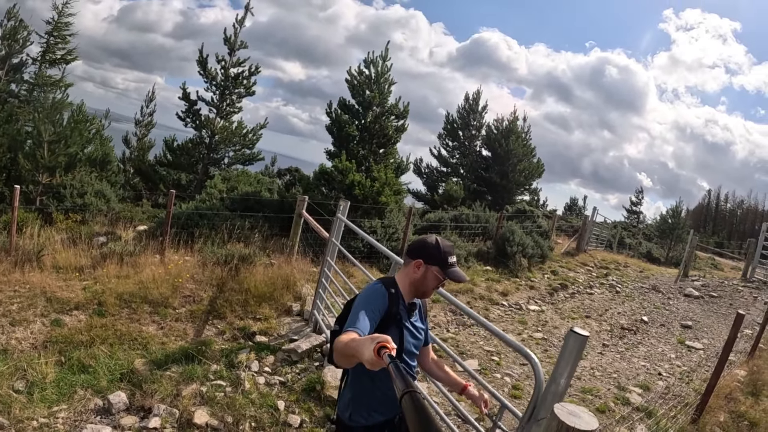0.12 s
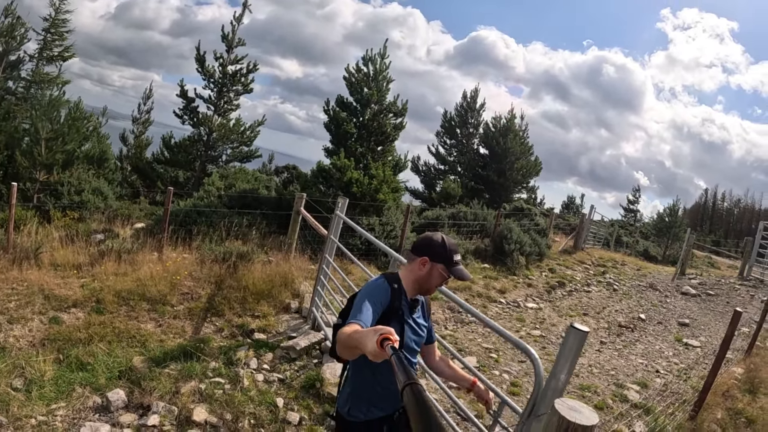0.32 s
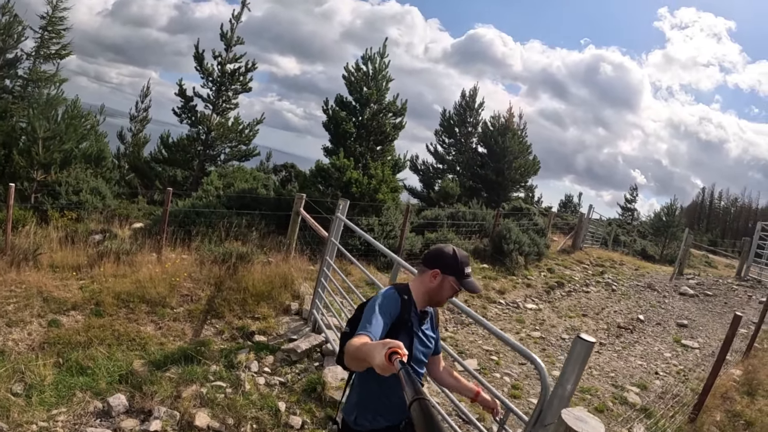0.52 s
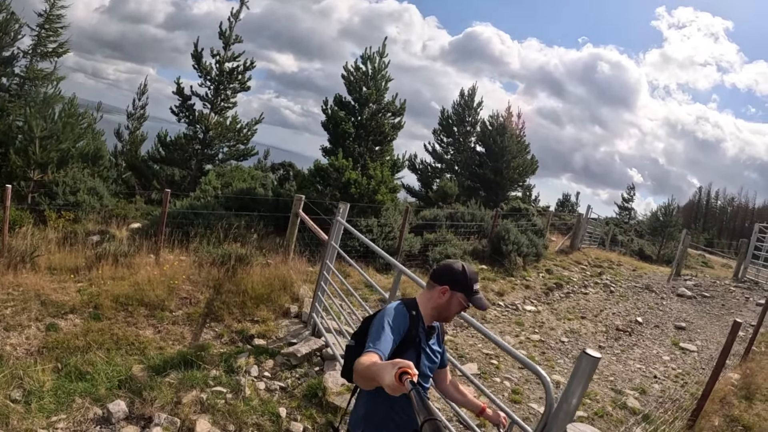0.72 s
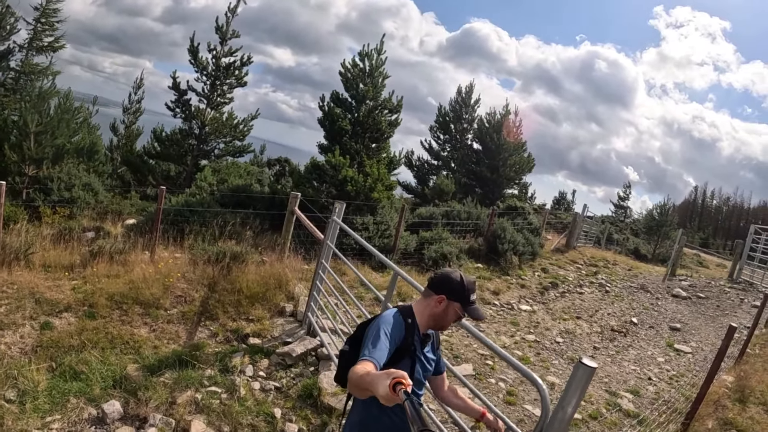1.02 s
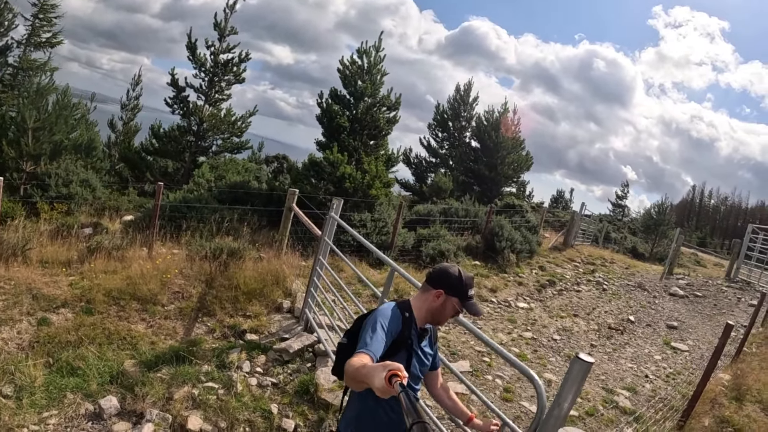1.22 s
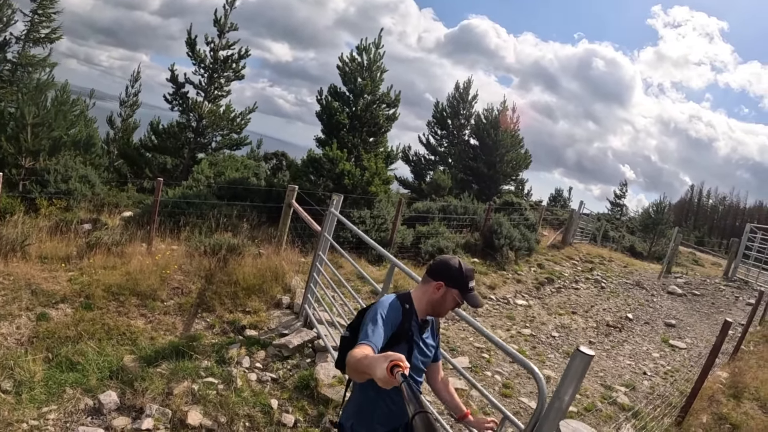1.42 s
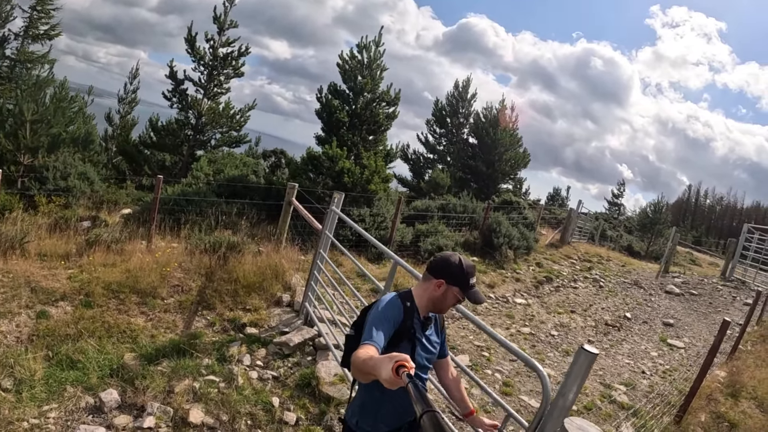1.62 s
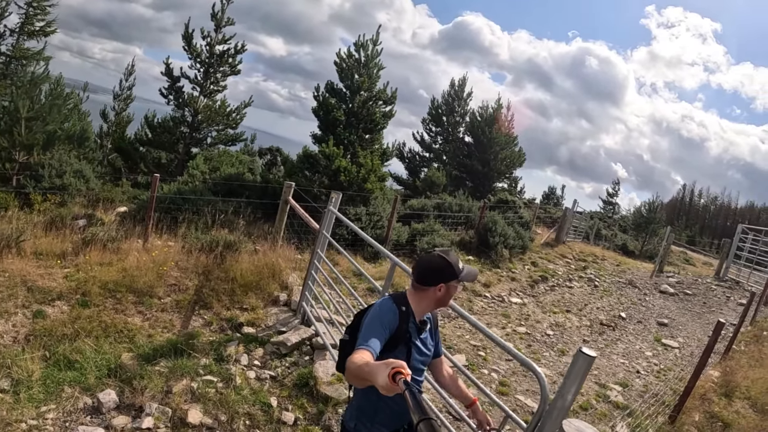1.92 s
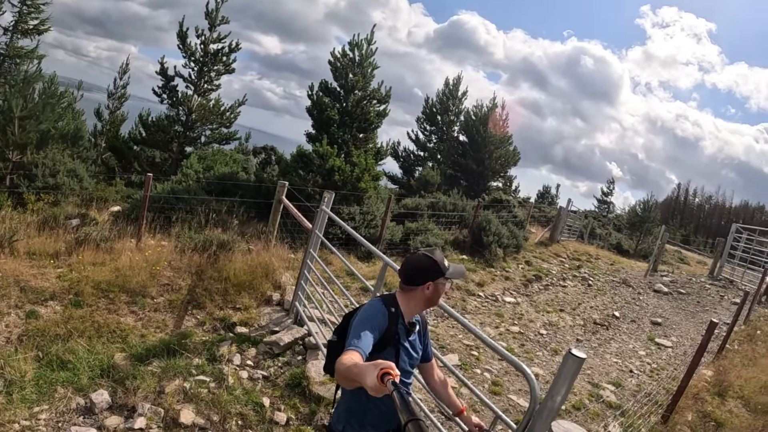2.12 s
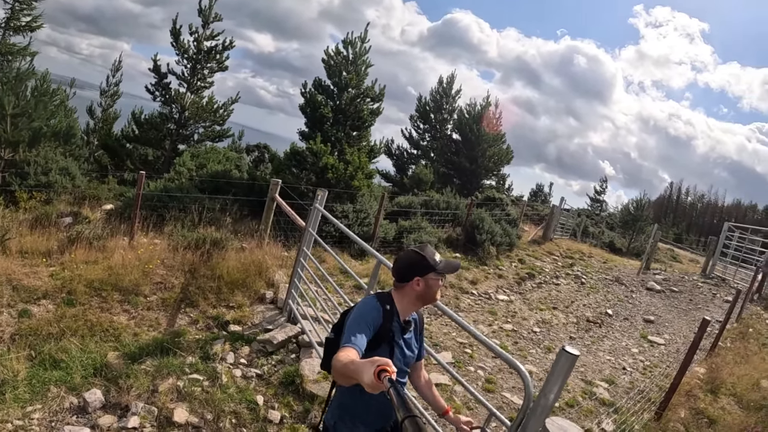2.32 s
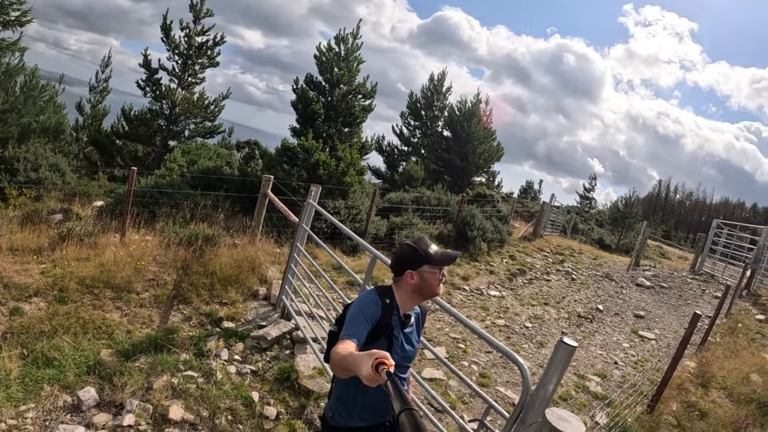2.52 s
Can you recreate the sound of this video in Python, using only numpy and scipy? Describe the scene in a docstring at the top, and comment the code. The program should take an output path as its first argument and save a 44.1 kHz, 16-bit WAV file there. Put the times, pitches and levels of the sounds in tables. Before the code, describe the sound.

Sharp clanks on a tubular metal farm gate build into a dense ringing rattle, ending in a hard bolt slam with a small bounce, then a shuddering scrape and a last soft cluster, close microphone, light open-air wind.

```python
"""Steel field gate shaken and latched

A tubular gate outdoors, an arm's length away, over light wind made of coloured noise.
Each knock sets off a dense clang of fading noise and a set of long, beating sine tones.
The bolt chinks and once slams against its stop and bounces, as short decaying sines.
Sliding metal hisses and the dragging frame shudders, both as noise with drawn level curves."""
import sys
import numpy as np
from scipy import signal
from scipy.fft import rfft, irfft, next_fast_len
from scipy.io import wavfile
from scipy.ndimage import uniform_filter1d

SR = 44100
rng = np.random.default_rng(int(sys.argv[2]) if len(sys.argv) > 2 else 0)


def waveform_to_disk(signal):
    """Save audio, clipped to [-1, 1], as 16-bit WAV at the path in sys.argv[1]."""
    frames = np.transpose(np.atleast_2d(signal))
    scaled = np.clip(frames, -1, 1) * 32767
    samples = np.round(scaled).astype(np.int16)
    wavfile.write(sys.argv[1], SR, samples)


N = 116865  # length in samples
ATTACK_S = 0.0005  # linear onset of every struck sound


def amp(db):
    """Decibels to gain."""
    return 10 ** (np.asarray(db) / 20)


def unit(x):
    """Scales to rms 1."""
    return x / np.sqrt(np.mean(x ** 2) + 1e-20)


def read(points, hz):
    """Reads a table on a log-frequency axis."""
    f, value = np.transpose(points)
    return np.interp(np.log(hz + 1), np.log(f + 1), value)


def level(points):
    """A dB curve over time as a gain per sample."""
    return amp(np.interp(np.arange(N) / SR, *np.transpose(points)))


def add(mix, start_s, sound):
    """Mixes a sound in at start_s; a negative start trims its beginning."""
    at = round(start_s * SR)
    sound = sound[max(-at, 0):]
    part = mix[max(at, 0):][:len(sound)]
    part += sound[:len(part)]


def noise(colour):
    """Steady noise of a given colour, rms 1."""
    size = next_fast_len(N)
    spectrum = rfft(rng.standard_normal(size))
    gain = amp(read(colour, np.fft.rfftfreq(size, 1 / SR)))
    return unit(irfft(spectrum * gain, size)[:N])


RIPPLE_DB, RIPPLE_S = 3, 0.038  # depth of the peaks and gaps; time they take to build


def ripple(x):
    """Close modes are uneven: a causal filter of narrow random peaks and gaps, fixed throughout x."""
    t = np.arange(2 * N) / SR
    paths = rng.standard_normal(len(t)) * t * np.exp(-2 * t / RIPPLE_S)
    size = next_fast_len(2 * N)
    shape = rfft(paths / np.linalg.norm(paths), size) * np.sqrt(2)
    gain = amp(RIPPLE_DB * shape)  # complex: the exponential of a causal response is causal
    gain /= np.sqrt(np.mean(abs(gain) ** 2))
    return irfft(rfft(x, size) * gain, size)[:N]


def ring(modes, blows, scatter_db, spread_hz):
    """Decaying tones, each beating with two close partners; every blow feeds them a little differently.

    modes: pitch_hz, level_db, t60_s; blows: start_s, level_db, treble_db."""
    t = np.arange(2 * N) / SR
    out = np.zeros(N)
    partners = rng.uniform(.3, 1.5, (len(modes), 2)) * [-1, 1]  # one below, one above
    chance = rng.standard_normal((len(blows), len(modes), 2))
    for k, (hz, db, t60) in enumerate(modes):
        time = t[:int(SR * np.clip(t60, .02, 3))]
        tone = np.sin(2 * np.pi * hz * time)
        for offset in partners[k]:
            partner_hz = hz + spread_hz * offset
            tone += .5 * np.sin(2 * np.pi * (partner_hz * time + rng.random()))
        tone *= amp(db - 60 * time / t60) * np.minimum(time / ATTACK_S, 1)
        for (start_s, blow_db, treble_db), (size, lag) in zip(blows, chance[:, k]):
            tilt_db = read([(MID_HZ, 0), (TREBLE_HZ, treble_db)], hz)
            delay_s = (lag % 1) / hz  # less than one cycle
            add(out, start_s + delay_s, amp(blow_db + tilt_db + scatter_db * size) * tone)
    return out


# colour of the open air: freq_hz, density_db (relative, dB per Hz)
AIR_COLOUR = [(20, -12), (40, 4), (75, -14.5), (120, -7.5), (220, 2), (400, 1), (1000, -13.5), (2000, -32),
              (4000, -39), (9000, -23), (15000, -42)]
AIR_DB = -53.5
# colour of the gusts: freq_hz, density_db (relative, dB per Hz)
GUST_COLOUR = [(20, -11), (40, -9), (80, -1), (130, -15.5), (300, -12), (1000, -64)]
# swell of the wind on the microphone: time_s, level_db
GUST_LEVEL = [(0, -83), (.4, -51.5), (.8, -61.5), (1.1, -52.5), (1.5, -57), (1.75, -47.5), (1.9, -56),
              (2.05, -48), (2.3, -53), (2.42, -37.5), (2.5, -55), (2.65, -46)]


def wind():
    """Turbulent air as two noises: steady open air and soft gusts on the microphone."""
    return amp(AIR_DB) * noise(AIR_COLOUR) + level(GUST_LEVEL) * noise(GUST_COLOUR)


# strength of the sliding metal, before its grain: time_s, level_db
SLIDE_LEVEL = [(.07, -68), (.1, -46), (.24, -46.5), (.32, -37), (.36, -48), (1.38, -52.5), (1.48, -44),
               (1.64, -47), (1.67, -41), (1.73, -55), (1.8, -66), (2.09, -83), (2.12, -53), (2.2, -49),
               (2.3, -93)]
# colour of the sliding hiss: freq_hz, density_db (relative, dB per Hz)
HISS_COLOUR = [(500, -8), (2000, 7.5), (4500, -4), (8500, -4.5), (11000, -15.5), (15000, -23)]
# strength of the dragging frame, before its ripple: time_s, level_db
DRAG_LEVEL = [(0, -41.5), (.1, -49), (.25, -48.5), (.32, -30.5), (.36, -70), (1.3, -32), (1.45, -33.5),
              (1.69, -28.5), (1.8, -35), (1.93, -42.5), (2.08, -45), (2.14, -39.5), (2.3, -44), (2.65, -72)]
# colour of the frame's shudder, before its ripple: freq_hz, density_db (relative, dB per Hz)
SHUDDER_COLOUR = [(100, -13), (190, -3.5), (290, -10.5), (450, 2.5), (700, -3.5), (1000, 5.5), (1350, -3.5),
                  (1900, -9.5), (3000, -19.5), (5000, -32), (10000, -58)]
GRAIN_DB = 1.5  # rms flicker of the hiss


def scrape():
    """Sliding metal gives a grainy hiss; the dragging frame gives a low shudder through its modes."""
    flicker = unit(uniform_filter1d(rng.standard_normal(N), size=130))
    hiss = amp(GRAIN_DB * flicker) * level(SLIDE_LEVEL) * noise(HISS_COLOUR)
    shudder = ripple(level(DRAG_LEVEL) * noise(SHUDDER_COLOUR))
    return hiss + shudder


# knocks on the frame, feeding bars and clang; the last three columns tilt only the clang:
# start_s, level_db (relative), bass_db, treble_db, top_db
KNOCKS = [(0.1417, -30.5, 3.5, -7, -3), (.222, -27.5, -11, -10, -22), (0.327, -15.5, 1.5, -1.5, 2.5),
          (0.4373, -19.5, 0.5, 2, -1.5), (.6075, -20, 3, -1.5, 0.5), (.627, -19, 5.5, -2, 13),
          (.697, -20, 5, -6.5, -7), (0.8758, -34.5, 2, -2, 5), (.982, -17.5, -6, -2, 15),
          (0.9972, -18, 0, 3.5, -4), (1.0582, -20, 6.5, -12, 14.5), (1.151, -16.5, 0.5, -4, -2.5),
          (1.199, -20, -0.5, 1, -11), (1.238, -23, 3.5, 0, 1.5), (1.415, -23.5, -14, -18, -33),
          (2.159, -25.5, 5, -18, -39), (2.211, -23, 4, -0.5, -14), (2.247, -24, 2, -6, -6),
          (2.26, -27.5, 5, 1.5, -4), (2.615, -62, 3, 12, 16)]
# a knock before the start, whose hum still lingers in the bars: start_s, level_db (relative)
EARLIER_KNOCK = (-0.56, -34)
# clear tones of the bars: pitch_hz, level_db (relative), t60_s
BAR_TONES = [(425.6, -11.5, 1.85), (518.4, -6.5, 2.43), (678.4, -8.5, 1.4), (819, -17.5, 1.5),
             (870, -9.5, 0.7), (928.6, -2.5, 1.55), (950, -2.5, 1.7), (1007, -8, 4.3), (1059, -13, 1.8),
             (1092, -4, 1.2), (1168, -3.5, 0.96), (1162, -10, 1.6), (1260, -5, 1.95), (1298, 0.5, 2.24),
             (1344, 0.5, 1), (1407, -8.5, 2.23), (1510, 0, 0.69), (1534, -9.5, 1.8), (1595, -2, 1),
             (1661, 2.5, 0.79), (1726, 1, 0.67), (1954, 0, 0.88), (2070, -1.5, 0.95), (2075, -1, 1),
             (2296, -2.5, 0.76), (2444, -6, 0.37), (2651, -5, 2.1), (2702, -3, 0.91), (2725, -12, 1.9),
             (2862, -20, 1.1), (2900, -26, 0.63), (2995, -12, 1.3), (3160, -17, 1), (3697, -8.5, 1),
             (3815, -13.5, 1.96), (5170, -10, 0.44), (4820, -13, 0.72)]
# single bars that ring out on their own, one already humming at the start: start_s, pitch_hz, level_db, t60_s
SINGLE_BARS = [(0, 513, -39, 0.44), (.3275, 2020, -14.5, 0.33), (.3275, 1518, -24.5, 1),
               (.627, 2380, -19, 0.27), (.627, 1673, -22, 0.35), (1.151, 2050, -21, 0.16),
               (1.2387, 948.4, -15, 0.51)]
BARS_DB, BARS_SCATTER_DB, BARS_SPREAD_HZ = -15, 2, 6.14


def bars():
    """Long bending tones of the tubes, fed by every knock; now and then one bar sings out."""
    blows = [(start_s, db, 0) for start_s, db, *_ in KNOCKS + [EARLIER_KNOCK]]
    out = amp(BARS_DB) * ring(BAR_TONES, blows, BARS_SCATTER_DB, BARS_SPREAD_HZ)
    t = np.arange(N) / SR
    for start_s, hz, db, t60 in SINGLE_BARS:
        envelope = amp(db - 60 * t / t60) * np.minimum(t / ATTACK_S, 1)
        add(out, start_s, envelope * np.sin(2 * np.pi * (hz * t + rng.random())))
    return out


# colour of the dense clang: freq_hz, density_db (relative, dB per Hz)
CLANG_COLOUR = [(60, -43), (140, -16.5), (190, -1.5), (270, -25.5), (400, -12.5), (520, -2.5), (720, -8.5),
                (950, -0.5), (1700, 0.5), (2200, -3), (2800, 2), (3400, -6), (4500, -10), (6500, -9.5),
                (8000, -12), (11000, -24.5), (15000, -35)]
# ring time of the clang: freq_hz, t60_s
CLANG_RING = [(150, 2.1), (500, 1.47), (1100, 1.68), (2000, 1.11), (3000, 1.01), (4500, 0.99), (6500, 0.32),
              (9000, 0.29), (15000, 0.27)]
# corners of a knock's tone controls; MID_HZ and TREBLE_HZ also set the treble tilt of ring()
BASS_HZ, MID_HZ, UPPER_HZ, TREBLE_HZ, TOP_HZ = 515, 1600, 2400, 6560, 11200
CLASH, CLASH_S = 1.0, 0.033  # extra strength just after contact (gain), and its decay time
CRACK, CRACK_S = 0.44, 0.009  # the instant of contact (gain), and its decay time


def clang():
    """Each knock wakes countless close modes of the tubes, heard as noise whose top dies first."""
    out = np.zeros(N)
    t = np.arange(N) / SR
    hz = np.fft.rfftfreq(512, 1 / SR)
    age = np.arange(N // 128 + 5)[:, None] * 128 / SR  # seconds, one row per spectral frame
    colour = amp(read(CLANG_COLOUR, hz))
    fade = amp(-60 * age / read(CLANG_RING, hz)) * colour / np.linalg.norm(colour)
    boost = 1 + CLASH * np.exp(-t / CLASH_S) + CRACK * np.exp(-t / CRACK_S)
    contact = np.minimum(t / ATTACK_S, 1) * boost
    for start_s, db, bass_db, treble_db, top_db in KNOCKS:
        controls = [(BASS_HZ, bass_db), (MID_HZ, 0), (UPPER_HZ, 0),
                    (TREBLE_HZ, treble_db), (TOP_HZ, top_db)]
        tilt = amp(read(controls, hz))
        random_phase = np.exp(2j * np.pi * rng.random(fade.shape))
        frames = random_phase * fade * tilt
        burst = signal.istft(frames.T, nperseg=512, noverlap=384)[1][:N]
        add(out, start_s, amp(db) * contact * burst)
    return ripple(out)


# chinks of the bolt: start_s, level_db (relative)
CHINKS = [(0.327, -32.5), (0.628, -38), (0.8737, -43), (0.9963, -29), (1.0585, -34)]
# tones of the bolt: pitch_hz, level_db (relative), t60_s
BOLT_TONES = [(4010, -12, 0.11), (5220, -3, .2), (5600, 1, .12), (6842, 3, 0.22), (7000, 3, 0.15),
              (7700, -1, 0.22), (9650, -5, 0.12), (10400, -8, 0.19), (11200, -11, 0.28), (14050, -6, 0.19)]
# the bolt slams against its stop and bounces: start_s, level_db (relative), treble_db
SLAMS = [(1.2389, -14.5, 4.5), (1.2505, -19, -21), (1.279, -24, -23)]
# resonances of the stop: pitch_hz, level_db (relative), t60_s
STOP_TONES = [(178.9, -13, 0.32), (506, -3.5, 0.095), (691, -2, 0.049), (925, 0.5, 0.16), (977, -1, 0.22),
              (1070, -6, 0.067), (1480, -23, 0.028), (1604, -2, 0.06), (2410, -7, .07), (5570, -2, .045),
              (8310, -9.5, .045), (8650, -10, 0.023)]


def bolt():
    """Small stiff parts ring short: bright chinks of the bolt and its hard slam on the stop."""
    blows = [(start_s, db, 0) for start_s, db in CHINKS]
    chinks = ring(BOLT_TONES, blows, scatter_db=.9, spread_hz=46)
    slam = ring(STOP_TONES, SLAMS, scatter_db=4.5, spread_hz=3.9)
    return chinks + slam


LOW_CUT_HZ = 199
SIDE_DB, AIR_SIDE_DB = -40, -25  # faint difference between the channels, rising in the treble, and a second, separate wind


def scene():
    """The thin tubes radiate no deep bass; everything lies straight ahead, with a trace of width."""
    low_cut = signal.butter(4, LOW_CUT_HZ, "high", fs=SR, output="sos")
    gate = signal.sosfilt(low_cut, clang() + bars() + bolt())
    mid = gate + scrape() + wind()
    side = amp(SIDE_DB) * np.gradient(mid) + amp(AIR_SIDE_DB) * wind()
    return np.array([mid + side, mid - side])


EDGE_HZ = 16000


def record(dry):
    """The recorder's band limit: a steep low-pass at EDGE_HZ."""
    low_pass = signal.firwin(511, EDGE_HZ, window=("kaiser", 9), fs=SR)
    return signal.oaconvolve(dry, low_pass[None], "same")


dry = scene()
out = record(dry)
waveform_to_disk(out)
```